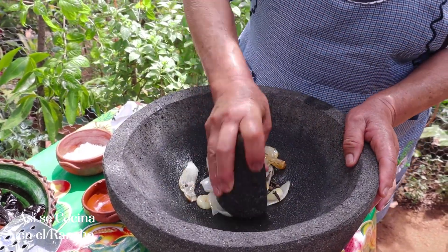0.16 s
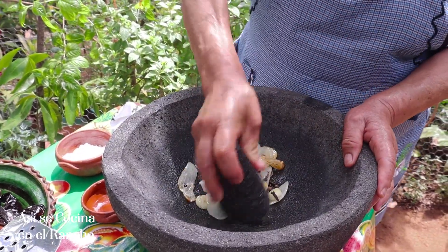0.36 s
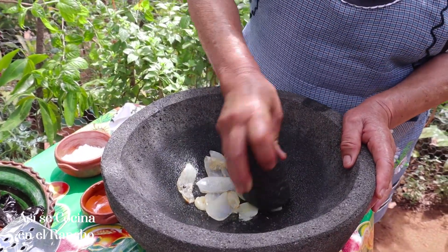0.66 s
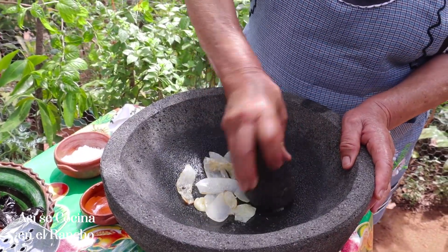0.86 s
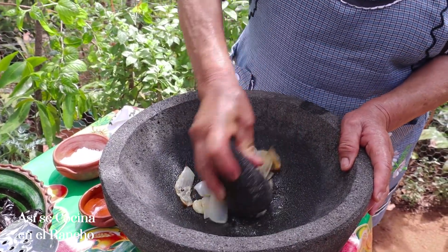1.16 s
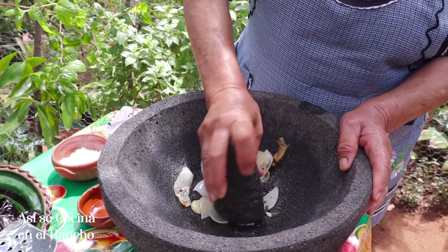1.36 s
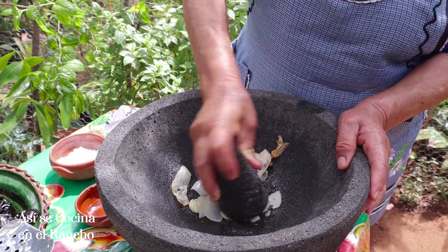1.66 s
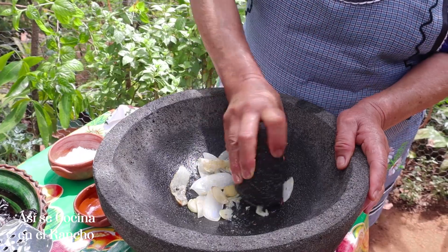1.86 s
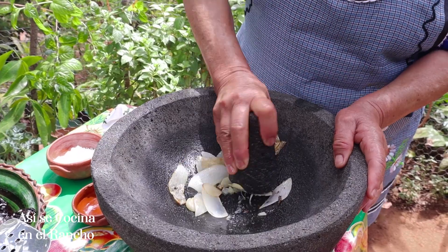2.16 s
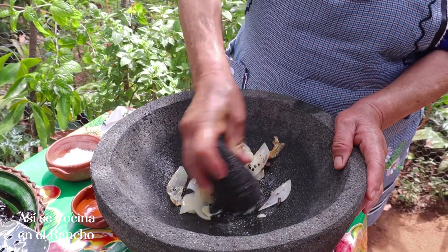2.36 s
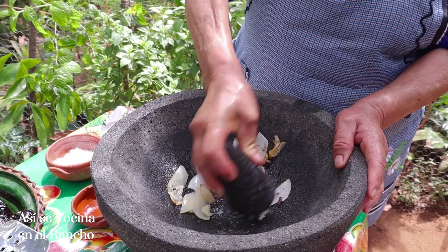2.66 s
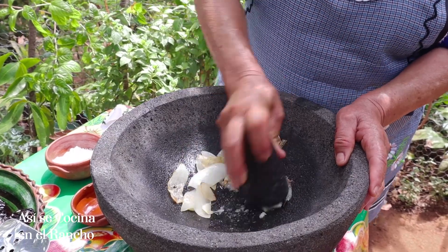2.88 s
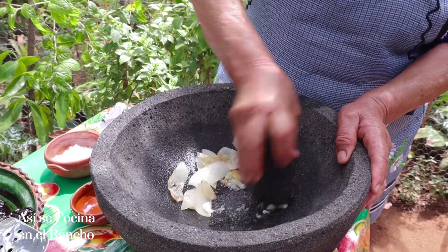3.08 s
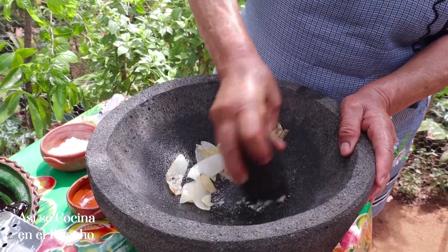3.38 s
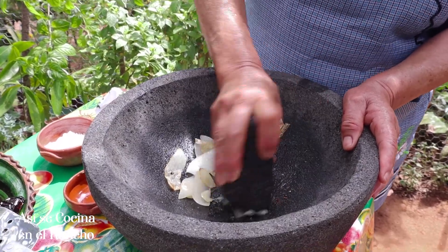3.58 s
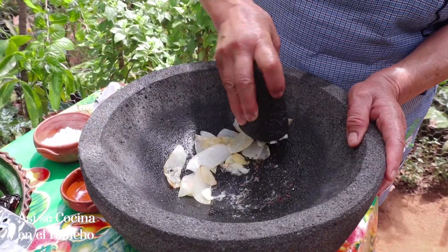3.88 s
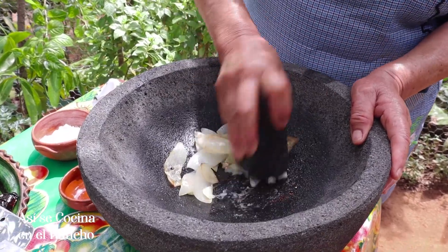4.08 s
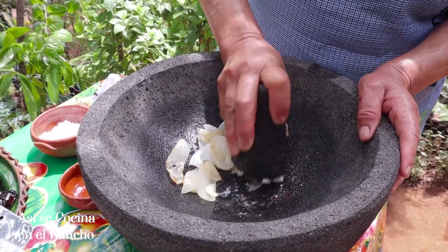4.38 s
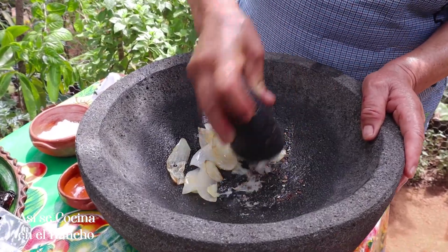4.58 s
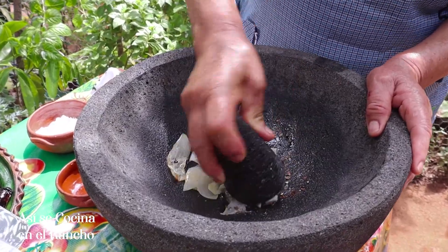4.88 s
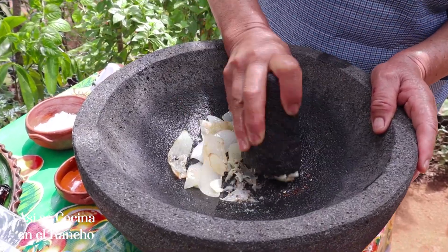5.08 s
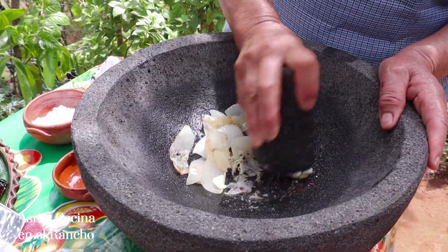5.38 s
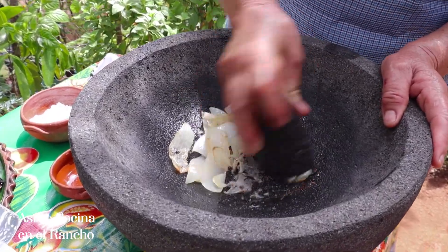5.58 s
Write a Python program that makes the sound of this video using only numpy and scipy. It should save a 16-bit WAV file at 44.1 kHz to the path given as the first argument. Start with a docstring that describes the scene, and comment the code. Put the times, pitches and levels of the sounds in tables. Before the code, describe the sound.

A close, dry outdoor sound of a stone pestle working raw onion and garlic in a heavy porous stone mortar, about six seconds. Two very loud, hard, short knocks come at about 0.07 and 0.37 s, with a tight stony ring. A softer knock lands at 0.84 s amid sparse, faint crackles. From 1.1 s, short irregular pushes, several each second, give crisp snaps, a bright one at 1.3 s, with gritty stone rasp and low bowl rumble. Small knocks cluster around 2.0 to 2.5 s. After 3.2 s the crushing is louder and pulpier, with juicy hiss; a clear knock falls at 3.55 s, a sharp tick at 4.13 s, and a heavier thud with a snap at 4.77 s, followed by the fullest crunch near 4.85 s. Pushes continue, crunchy and wet, to the end. Behind is a very soft outdoor hush with barely audible distant whistles.

```python
"""Hard knocks of a stone pestle on a porous stone mortar open the scene, close by, over a soft outdoor hush.
The pestle then leans on raw onion and garlic in short pushes: crisp flesh snaps, crunches and squirts
while stone rasps on stone and the heavy bowl rumbles. Knocks are short damped tones that excite the bowl's
modes; snaps are decaying bursts of breaks; grinding is random grains coloured by filters and shaped by pressure.
The bowl adds quick echoes, its surroundings a faint scatter."""
import sys
import numpy as np
from scipy import signal
from scipy.fft import rfft, irfft
from scipy.io import wavfile
from scipy.ndimage import uniform_filter1d

SR = 44100
rng = np.random.default_rng(int(sys.argv[2]) if len(sys.argv) > 2 else 0)


def unload_audio(sound):
    """Save the sound as a 16-bit wav file, at the path given as the first command line argument."""
    columns = np.transpose(np.atleast_2d(sound))
    # keep every value between -1 and 1, then stretch to whole-number steps
    steps = np.round(np.clip(columns, -1, 1) * 32767)
    wavfile.write(sys.argv[1], SR, steps.astype(np.int16))


N = 252913
TIME = np.arange(N) / SR
BAND_LIMIT_HZ = 16200

# Spectrum of the outdoor hush: frequency_hz, relative_level_db
GARDEN_SPECTRUM = [(12, -53), (20, 3), (50, 2.5), (91, -9.5), (434, -7.5), (660, -8), (780, -4), (849, -6),
                   (1190, -13.5), (1960, -12.5), (2320, -14), (2600, -15.5), (16000, -32.5)]
GARDEN_DB = -51.5  # about which the hush drifts
# Thin far-off whistles: start_s, length_s, start_hz, end_hz, level_db (before fading and wavering)
FAR_WHISTLES = [(0, 0.057, 2130, 2140, -55), (0.526, 0.12, 2080, 2060, -59), (.63, 0.1, 2500, 2500, -57),
                (2.076, 0.28, 2520, 2380, -60), (2.709, 0.11, 813, 792, -53.5)]
# Decay of the scatter around the bowl: frequency_hz, t60_s
AIR_DECAY = [(200, 0.61), (1200, 0.16), (4000, 0.16), (14000, 0.14)]

# Modes of the mortar: frequency_hz, relative_level_db, t60_s
BOWL_MODES = [(280, -13, .085), (370, -15, .05), (490, -15, .055), (622, -17, .06), (850, -10, .04),
              (1020, -6, .018), (1130, -2.5, .04), (1190, -6, .052), (1525, -7, .032), (1760, -10, .018),
              (2180, -15, .028), (2405, -15, .028), (2610, -16, .02), (3015, -11, .032), (3400, -14, .026),
              (3630, -12, .026), (3790, -17, .014)]
# Landings of the pestle: start_s, thud_peak_db, thud_pitch_hz, thud_decay_cycles (at least 0.1),
# contact_cutoff_hz (higher for a harder contact), ring_peak_db (bowl and grit together)
PESTLE_KNOCKS = [(0.0692, -0.5, 950, 0.62, 1940, -6), (0.1399, -27, 636, 0.33, 3300, -27.5),
                 (0.2028, -27, 293, 1.7, 694, -22.5), (.3670, -1, 1350, 0.079, 3800, -1.5),
                 (0.8387, -13.5, 900, 1.2, 1840, -23), (1.1219, -22.5, 284, 1.54, 900, -25),
                 (1.1920, -36, 296, 1.4, 696, -30.5), (1.322, -28.5, 250, 1.3, 1390, -40),
                 (1.8099, -29.5, 487, 0.78, 3500, -30), (2.0055, -21, 727, 1.25, 1330, -49),
                 (2.0880, -27, 770, 0.59, 1300, -57), (2.2554, -21.5, 261, 0.58, 750, -27.5),
                 (2.3390, -18.5, 218, 0.41, 795, -28), (2.3573, -17, 636, 0.91, 1100, -32),
                 (2.4000, -30, 590, 1.6, 900, -47), (2.4530, -24, 780, 0.57, 1000, -40),
                 (2.459, -29, 284, 1.7, 800, -25), (2.569, -25.5, 188, 0.39, 1300, -28.5),
                 (2.843, -24.5, 142, 0.48, 300, -58), (3.023, -28.5, 960, 1.7, 1300, -30),
                 (3.2620, -23, 890, 0.61, 1370, -25.5), (3.304, -17.5, 553, 1.03, 1310, -21.5),
                 (3.5514, -10.5, 1000, 0.39, 1670, -16.5), (4.0040, -36.5, 96, 0.96, 200, -57),
                 (4.1355, -37, 450, 0.46, 3500, -25), (4.2610, -25, 645, 0.92, 1400, -32.5),
                 (4.7662, -9, 570, 0.89, 1330, -19.5), (4.7678, -10, 188, 0.44, 400, -20.5),
                 (5.4255, -25, 590, 0.29, 1180, -34)]
# Crisp pieces giving way: start_s, level_db (over 5 ms), pitch_hz (at most SR / 4), tear_decay_s
FLESH_SNAPS = [(0.14, -47.5, 2700, 0.0016), (0.1982, -31.5, 2750, 0.013), (0.2065, -32, 7550, 0.0006),
               (0.3675, -29, 2620, 0.00064), (0.7428, -35, 7050, 0.00035), (0.772, -36.5, 5700, 0.0013),
               (0.9742, -27.5, 5570, 0.0035), (1.0507, -27.5, 4100, 0.0009), (1.0579, -29.5, 6200, 0.00033),
               (1.121, -21, 4530, 0.0015), (1.1297, -25.5, 9000, 0.00024), (1.1396, -29.5, 6700, 0.0016),
               (1.3, -32.5, 6700, 0.00038), (1.321, -16.5, 3830, 0.00071), (1.3246, -16.5, 4000, 0.0018),
               (1.33, -31, 3900, 0.002), (1.339, -32, 4800, 0.0018), (1.3677, -32.5, 6500, 0.0019),
               (1.5884, -37.5, 5700, 0.00063), (1.6411, -34, 7160, 0.00038), (1.8097, -35, 3740, 0.0022),
               (1.9883, -29.5, 3630, 0.0028), (2.2088, -34, 4970, 0.0011), (2.2308, -39, 4900, 0.00074),
               (2.2556, -22, 3430, 0.0017), (2.3368, -20.5, 5560, 0.0025), (2.5296, -38, 4230, 0.0018),
               (2.5666, -26, 5100, 0.00078), (2.5687, -18.5, 5150, 0.0013), (2.7113, -30, 4800, 0.00049),
               (2.84, -34.5, 4240, 0.0061), (2.9475, -26.5, 7040, 0.0098), (3.0088, -23.5, 3530, 0.0029),
               (3.2128, -27.5, 6300, 0.00031), (3.3271, -22, 9200, 0.0051), (3.365, -31, 12100, 0.00017),
               (3.51, -27, 4840, 0.0016), (3.5472, -32.5, 4760, 0.0038), (4.1168, -32, 4800, 0.0014),
               (4.1345, -10, 4640, 0.00017), (4.138, -25, 5370, 0.0023), (4.1924, -25, 4440, 0.00039),
               (4.221, -32.5, 7000, 0.00022), (4.4787, -32.5, 7600, 0.00067), (4.7635, -17.5, 3760, 0.0019),
               (4.767, -16.5, 3630, 0.00055), (5.1813, -27, 4800, 0.0019), (5.696, -25, 5070, 0.0074)]

# Pushes of the pestle: start_s, length_s, swell_db (over the push), crunch_db, fizz_db, rasp_db,
# rumble_db, wedge_hz (starting resonance of the air wedge under the pestle)
PESTLE_PUSHES = [(0.001, 0.051, 16.5, -53.0, -50.5, -67.0, -55, 4400.0),
                 (0.044, 0.024, 3, -52.0, -57, -34, -38.5, 3030.0),
                 (0.172, 0.049, -1, -49.0, -56.0, -42.5, -51, 3910.0),
                 (0.257, 0.031, -5, -48, -48, -54.0, -67.0, 4800),
                 (0.299, 0.06, 8, -47.5, -51.5, -67, -59.0, 3000.0),
                 (0.349, 0.062, -13, -65.0, -79, -52, -45.0, 2950.0),
                 (0.562, 0.04, -3, -49, -51, -64, -69.0, 4700),
                 (0.69, 0.15, -12, -47, -48.5, -58, -50, 5250),
                 (0.885, 0.061, 14, -54, -50.5, -58, -52, 5180.0),
                 (0.967, 0.019, 3.5, -48, -52, -49, -41, 5480.0),
                 (1.039, 0.062, -21, -42, -47, -44, -39.5, 4060.0),
                 (1.106, 0.025, 4.0, -33.5, -34.5, -43, -35, 4960.0),
                 (1.205, 0.029, 3, -62, -51, -64, -45, 4570.0),
                 (1.217, 0.076, -3, -44.5, -45.5, -55, -48, 5280.0),
                 (1.304, 0.069, -2, -38.5, -39.5, -44.5, -40.5, 3540),
                 (1.385, 0.057, -10.5, -41.0, -44, -49, -45, 4670.0),
                 (1.478, 0.099, 10, -44, -46.5, -56.5, -48.5, 5110.0),
                 (1.62, 0.05, -3.5, -40, -43.5, -40, -36.5, 5000),
                 (1.699, 0.058, -9.5, -40.5, -47.5, -43.5, -48, 2720),
                 (1.8, 0.024, 0, -56, -56, -39, -43, 3450.0),
                 (1.853, 0.13, -7, -43.5, -45, -48.5, -42.5, 4760.0),
                 (1.975, 0.028, 9, -46.0, -41.5, -38.5, -34.0, 3160.0),
                 (2.028, 0.064, 4, -49, -50.0, -52.0, -47.5, 3220),
                 (2.147, 0.062, 12.5, -44.5, -47, -48.0, -42.0, 4840.0),
                 (2.252, 0.0093, 0, -42.5, -58, -38, -32, 3380.0),
                 (2.316, 0.061, 7, -41.0, -42, -43, -37.5, 4710.0),
                 (2.482, 0.049, -10, -39.5, -45.0, -40.5, -34.0, 3840.0),
                 (2.554, 0.12, -9, -40.5, -44, -39.0, -36.5, 4620.0),
                 (2.697, 0.031, -3.0, -56, -51, -58.0, -44, 5010.0),
                 (2.824, 0.083, -8, -51.5, -50.5, -53, -45.5, 4170.0),
                 (2.921, 0.049, 10, -45.0, -41.5, -57, -44.5, 5590.0),
                 (2.949, 0.085, 1.5, -44.5, -52.0, -42.5, -40.5, 3710.0),
                 (3.127, 0.043, -1, -41, -54.0, -38.5, -40.5, 4600),
                 (3.154, 0.084, -22, -42.5, -37.0, -47, -46, 5740.0),
                 (3.21, 0.093, 7, -51, -56, -42.5, -48, 4820.0),
                 (3.274, 0.061, 5.5, -36.5, -35.0, -35.5, -35, 5760.0),
                 (3.352, 0.066, -4.0, -49.5, -53, -60, -54, 5330.0),
                 (3.431, 0.062, 8, -33.5, -36.5, -44.5, -43, 5010.0),
                 (3.595, 0.07, -2.5, -31.5, -33.5, -30, -39, 4700),
                 (3.671, 0.031, -2.5, -40.5, -42.0, -44.5, -36, 4860),
                 (3.754, 0.01, -7, -49, -44, -69, -67.0, 4720.0),
                 (3.984, 0.065, -13.5, -32.5, -41.0, -49.5, -56, 3300),
                 (4.058, 0.065, 16.5, -32, -39, -48, -44, 4400),
                 (4.121, 0.12, -13.5, -32, -34, -38, -34, 4920.0),
                 (4.306, 0.059, 11.0, -40, -45.5, -49, -45.5, 4740),
                 (4.405, 0.079, -1, -36.5, -43, -44.5, -47.5, 4250),
                 (4.465, 0.056, -10, -32, -36.5, -37, -38, 4940),
                 (4.524, 0.03, 12, -45.5, -42.5, -68, -62.0, 4990.0),
                 (4.739, 0.095, -7.5, -34.5, -37.5, -46, -37.5, 3340.0),
                 (4.833, 0.1, -9.5, -24, -38.5, -43, -39.0, 4160),
                 (5.029, 0.07, 2, -31.5, -37.5, -46.5, -41.5, 3300),
                 (5.098, 0.079, 3.0, -41.5, -46.5, -49.0, -44.5, 4540),
                 (5.155, 0.12, -4.5, -33.0, -36.5, -42.0, -40, 4540),
                 (5.343, 0.1, -16.5, -37, -37, -42, -40, 4500),
                 (5.414, 0.021, 2, -44, -49, -39, -33.5, 3130),
                 (5.478, 0.029, -3, -35.5, -36, -41.5, -44, 4160.0),
                 (5.51, 0.042, 4.5, -38, -34.5, -41.5, -36.5, 4600),
                 (5.579, 0.01, 1, -62, -60, -55, -45, 5020.0),
                 (5.647, 0.038, 11, -36.5, -37.5, -46.5, -42.5, 4570.0),
                 (5.714, 0.045, 1, -40, -45, -39, -32, 4600)]
# Whole pieces crackle, pulp hisses evenly: time_s, click_share (of the power, 0-1)
CRISPNESS_CURVE = [(0, 0.87), (1.2, 0.55), (2.9, 0.87), (3.4, 0), (4.2, 0.48), (4.85, 0.24), (5.5, 0.65)]
# Spectrum of the crunching flesh: frequency_hz, relative_level_db
CRUNCH_SPECTRUM = [(600, -28.5), (1500, -11.5), (2000, -6.5), (2800, -2), (3500, 1.5), (4300, -4),
                   (5100, -2.5), (6000, -3.5), (7200, -17.5), (10000, -29), (16000, -44)]
# Spectrum of the juicy fizz: frequency_hz, relative_level_db
FIZZ_SPECTRUM = [(2500, -39.5), (5000, 7.5), (7000, 9), (9000, 8), (11500, 7), (14000, 3.5), (15300, -1),
                 (16500, -17)]
# Spectrum of stone rasping on stone: frequency_hz, relative_level_db
RASP_SPECTRUM = [(200, -9), (400, 1), (580, 4.5), (830, 1), (1080, -0.5), (1200, 0.5), (1380, -6.5),
                 (2000, -6), (3000, -30), (6000, -50)]
# Spectrum of the rumbling bowl: frequency_hz, relative_level_db
RUMBLE_SPECTRUM = [(20, -27), (50, -12), (85, -1.5), (115, -9), (165, 2), (205, -2), (280, 2.5),
                   (350, -7.5), (450, -19), (700, -33), (2000, -42.5)]
# Gain of the top treble in the fizz: time_s, gain_db
FIZZ_TREBLE = [(0, 0.5), (1.2, -0.5), (2.2, 3), (3.3, -1), (3.7, 2), (4.15, 5.5), (4.8, 3.5), (5.2, -4.5),
               (5.6, -6)]
FIZZ_TREBLE_HZ = 10400

# Pressure builds over a share of the push, drops as the hand lets go, then the pulp settles quietly
ATTACK_SHARE = 0.33
RELEASE_DB_PER_S, SETTLE_DB, SETTLE_DB_PER_S = 750, -16.5, 120
# The flesh gives first; the stone is reached, and the bowl rocks, a little later
STONE_LAG_S, BOWL_LAG_S = 0.0011, 0.01
WEDGE_OCTAVES_PER_S = 0.55  # the air wedge narrows as the pestle rolls
RASP_RING_DB = -12  # rasp ringing in the bowl's modes, relative to the direct rasp
PEEL_DB, PEEL_CLING_S = -13.5, 0.091  # level relative to the fizz; time the wet pulp clings


def amp(db):
    """Level law: decibels to amplitude ratio."""
    return 10 ** (np.asarray(db) / 20)


def unit(x):
    """Normalization: scales a signal to rms 1."""
    return x / np.sqrt(np.mean(x ** 2) + 1e-20)


def read(points, hz):
    """Interpolation: reads a table on a log-frequency axis."""
    f, value = np.transpose(points)
    return np.interp(np.log(hz + 1), np.log(f + 1), value)


def add(mix, s, sound):
    """Superposition: mixes a sound in at time s."""
    part = mix[max(round(s * SR), 0):][:len(sound)]
    part += sound[:len(part)]


def butter(x, hz, kind, order=2):
    """Butterworth filtering: a causal low-pass or high-pass, cut-off at most SR / 3."""
    return signal.sosfilt(signal.butter(order, min(hz, SR / 3), kind, fs=SR, output="sos"), x)


def colour(x, points, size=2048):
    """Minimum-phase filtering: a causal response with a given spectrum keeps the front of a click sharp."""
    log_gain = np.log(amp(read(points, abs(np.fft.fftfreq(size, 1 / SR)))))
    response = np.fft.ifft(np.exp(np.conj(signal.hilbert(log_gain)))).real
    return signal.oaconvolve(x, response)[:len(x)]


def wander(hz):
    """Band-limited noise: a random drift of rms 1, strongest a little below hz."""
    ratio = np.fft.rfftfreq(N, 1 / SR) / hz
    return unit(irfft(rfft(rng.standard_normal(N)) * ratio / (1 + ratio ** 4), N))


def grains(per_s, spread_db):
    """Random impulses: tiny breaks; a wider spread makes many small and a few large."""
    size = amp(spread_db * np.minimum(rng.exponential(1, N), 3.3))
    sign = rng.choice([-1., 1.], N)
    occurs = rng.random(N) < per_s / SR
    return unit(size * sign * occurs)


def patchy(x, depth_db, size=(16, 9)):
    """Time-varying spectrum: the colour shifts as the contact moves over pieces and pores."""
    z = signal.stft(x, SR, nperseg=256)[2]
    field = rng.standard_normal(z.shape)
    # smooth over time frames, then over frequency bins
    field = uniform_filter1d(field, size[0], axis=1)
    field = uniform_filter1d(field, size[1], axis=0)
    return unit(signal.istft(z * amp(depth_db * unit(field)), SR, nperseg=256)[1][:N])


def resonate(x, hz, width_hz):
    """Resonance: a peak of gain 1 follows the curve hz, by shifting it to zero frequency and back."""
    turn = np.exp(2j * np.pi * np.cumsum(hz) / SR)
    r = np.exp(-np.pi * width_hz / SR)
    return 2 * (turn * signal.lfilter([1 - r], [1, -r], x / turn)).real


def garden(drift_db=1.3, waver=0.0071, fade_db=4):
    """Ambient noise: a soft drifting hush, and far-off whistles as wavering, fading sines."""
    hush = unit(colour(rng.standard_normal(N), GARDEN_SPECTRUM))
    out = amp(GARDEN_DB + drift_db * wander(13.5)) * hush
    sway = 1 + waver * wander(56)
    fade = unit(amp(fade_db * np.clip(wander(27), -2, 1.5)))
    for s, length, start_hz, end_hz, db in FAR_WHISTLES:
        hz = np.linspace(start_hz, end_hz, round(length * SR))
        start = max(round(s * SR), 0)
        turns = np.cumsum(hz * sway[start:][:len(hz)]) / SR
        swell = fade[start:][:len(hz)] * signal.windows.tukey(len(hz), .5)
        add(out, s, amp(db) * swell * np.sin(2 * np.pi * turns))
    return out


def surroundings(x, wall_db=-12, wall_t60_s=0.026, air_db=-25, move_hz=0.708, count=4):
    """Reflection: bowl-wall echoes shift as the hand moves; table and plants scatter faintly."""
    t = np.arange(SR // 3) / SR
    sign = rng.choice([-1., 1.], (count + 1, len(t)))
    taps = sign * (rng.random((count + 1, len(t))) < 4000 / SR)
    # the scatter decays at its own rate in each band
    hz, age, z = signal.stft(taps[-1] * (t > .006), SR, nperseg=256)
    decay = amp(-60 * age / read(AIR_DECAY, hz)[:, None])
    air = signal.istft(z * decay, SR, nperseg=256)[1][:len(t)]
    out = x + amp(air_db) * signal.oaconvolve(x, air / np.linalg.norm(air))[:N]
    for k in range(count):
        walls = taps[k] * amp(-60 * t / wall_t60_s) * (t > .0007)
        # the bowl is too small to throw back long waves
        echo = butter(walls / np.linalg.norm(walls), 1970, "high")
        # each place of the hand has its own echoes
        place = np.maximum(np.cos(2 * np.pi * (move_hz * TIME - k / count)), 0)
        out = out + amp(wall_db) * signal.oaconvolve(x * place, echo)[:N]
    return out


def bowl_ring(scatter_db):
    """Modal vibration: a sum of damped sines; each spot of the bowl weights them differently."""
    t = np.arange(SR // 5) / SR
    hz, db, t60 = np.transpose(BOWL_MODES)[:, :, None]
    spot_db = scatter_db * rng.standard_normal(hz.shape)
    # neighbouring modes move the rim in opposite directions, so the ring takes a few ms to build
    sign = (-1) ** np.arange(len(hz))[:, None]
    return (sign * amp(db + spot_db - 60 * t / t60) * np.sin(2 * np.pi * hz * t)).sum(0)


def knocks(scatter_db=4.0, swell=0.66, leak=0.58, ring_low_hz=230, grit_db=-7, grit_s=0.0052):
    """Impact: the stopped pestle pushes out a short thud; harder contacts reach higher bowl modes."""
    out, t = np.zeros(N), np.arange(SR // 5) / SR
    for s, thud_db, thud_hz, cycles, contact_hz, ring_db in PESTLE_KNOCKS:
        age = t * thud_hz / max(cycles, .1)
        thud = age ** swell * np.exp(-age) * np.sin(2 * np.pi * thud_hz * t)
        # slow pressure changes leak around the stone instead of radiating
        thud = butter(thud, leak * thud_hz, "high", order=1)
        # the rough faces chatter for a few ms as they seat
        grit = butter(rng.standard_normal(len(t)) * np.exp(-t / grit_s), 2600, "low", order=4)
        modes = bowl_ring(scatter_db)
        ring = modes / abs(modes).max() + amp(grit_db) * grit / abs(grit).max()
        ring = butter(ring, contact_hz, "low", order=3)
        ring = butter(ring, ring_low_hz, "high", order=3)
        knock = amp(thud_db) * thud / abs(thud).max() + amp(ring_db) * ring / abs(ring).max()
        add(out, s, knock)
    return out


def snaps(relative_width=0.39, splinter_db=4.5, first_crack=1.44, edge_db=-13, low_hz=2100):
    """Brittle fracture: one sharp break and a dying burst of smaller ones excite a broad resonance."""
    out, t = np.zeros(N), np.arange(SR // 30) / SR
    for s, db, hz, length in FLESH_SNAPS:
        splinters = amp(splinter_db * rng.standard_normal(len(t)))
        breaks = unit(rng.standard_normal(len(t)) * splinters)
        breaks[0] = first_crack
        tear = breaks * np.exp(-t / max(length, 1 / SR))
        # the broken piece rings for a cycle or two
        body = signal.lfilter(*signal.iirpeak(min(hz, SR / 4), 1 / relative_width, fs=SR), tear)
        snap = butter(body + amp(edge_db) * tear, low_hz, "high", order=3)
        snap = butter(snap, SR / 3, "low")
        rms_5ms = np.sqrt(np.sum(snap ** 2) / (SR // 200))
        add(out, s, amp(db) * snap / rms_5ms)
    return out


def pressure(levels_db, lag_s=0):
    """Contact force: build, a hold that swells or eases, quick release and faint settling; powers add."""
    power, t = np.zeros(N), np.arange(SR // 2) / SR
    for (s, length, swell_db, *_), db in zip(PESTLE_PUSHES, levels_db):
        progress = np.minimum(t / max(length, 1 / SR), 1)
        after = np.maximum(t - length, 0)
        build = np.minimum(progress / ATTACK_SHARE, 1)
        hold = amp(db + swell_db * (progress - .5))
        release = np.maximum(amp(-RELEASE_DB_PER_S * after), amp(SETTLE_DB - SETTLE_DB_PER_S * after))
        add(power, s + lag_s, (build * hold * release) ** 2)
    return np.sqrt(power)


def wedge_pitch(starts, hz):
    """Cavity resonance: the air under the pestle starts anew at each push and glides up as it rolls."""
    push = np.maximum(np.searchsorted(starts, TIME) - 1, 0)
    return hz[push] * 2 ** (WEDGE_OCTAVES_PER_S * (TIME - starts[push]))


def peeling(fizz):
    """Adhesion: wet pulp pulling off the stone ticks sparsely during and around each push."""
    wet = np.sqrt(abs(uniform_filter1d(fizz ** 2, round(PEEL_CLING_S * SR))))
    ticks = colour(grains(per_s=90, spread_db=8.5), FIZZ_SPECTRUM)
    return amp(PEEL_DB) * wet * patchy(ticks, depth_db=5)


def sparkle(x):
    """Spectral tilt: raises or lowers the top treble over time."""
    f = np.fft.rfftfreq(N, 1 / SR)
    top = irfft(rfft(x) * (1 - 1 / (1 + (f / FIZZ_TREBLE_HZ) ** 10)), N)
    gain = amp(np.interp(TIME, *np.transpose(FIZZ_TREBLE)))
    return x + (gain - 1) * top


def grinding(judder_hz=80, judder_db=3.5, patch_db=3.0, wedge_width_hz=1700):
    """Stick-slip friction: cells burst, juice fizzes, and the pores of the stone catch."""
    starts, _, _, crunch_db, fizz_db, rasp_db, rumble_db, wedge_hz = np.transpose(PESTLE_PUSHES)
    crunch, fizz = pressure(crunch_db), pressure(fizz_db)
    rasp, rumble = pressure(rasp_db, STONE_LAG_S), pressure(rumble_db, BOWL_LAG_S)
    crisp = np.clip(np.interp(TIME, *np.transpose(CRISPNESS_CURVE)), .01, 1)
    judder = unit(amp(judder_db * np.sqrt(crisp) * np.clip(wander(judder_hz), -2, 2)))

    # larger cell walls click across the whole treble, over a dense mush of small ones
    crackle = np.sqrt(crisp) * grains(per_s=1100, spread_db=7.5)
    mush = np.sqrt(1 - crisp) * grains(per_s=3600, spread_db=0.0)
    flesh = colour(judder * (crackle + mush), CRUNCH_SPECTRUM)
    flesh = flesh + resonate(flesh, wedge_pitch(starts, wedge_hz), wedge_width_hz)

    squirts = np.sqrt(1 - crisp) * grains(per_s=11000, spread_db=12.5)
    juice = colour(judder * (crackle + squirts), FIZZ_SPECTRUM)

    # the catching pores are heard directly and through the bowl's modes
    pores = judder * grains(per_s=1100, spread_db=3.0)
    ringing = unit(signal.oaconvolve(pores, bowl_ring(0))[:N])
    stone = unit(colour(pores, RASP_SPECTRUM)) + amp(RASP_RING_DB) * ringing
    stone = unit(butter(stone, 110, "high"))

    # the pestle rides over lumps and rocks the heavy bowl
    bumps = judder * grains(per_s=400, spread_db=1.5)
    rocking = unit(colour(bumps, RUMBLE_SPECTRUM))

    crunching = crunch * patchy(flesh, patch_db)
    fizzing = sparkle(fizz * patchy(juice, patch_db) + peeling(fizz))
    return crunching + fizzing + rasp * stone + rumble * rocking


def scene():
    """Superposition: the mortar with its reflections, and the garden."""
    mortar = surroundings(knocks() + snaps() + grinding())
    return (mortar + garden())[None]


def record(dry, ceiling=1.6):
    """Saturation and band limiting: rounds off the loudest peaks, then removes the extreme treble."""
    rounded = dry / (1 + (dry / ceiling) ** 4) ** (1 / 4)
    low_pass = signal.firwin(401, BAND_LIMIT_HZ, window=("kaiser", 9), fs=SR)
    return signal.oaconvolve(rounded, low_pass[None], "same")


dry = scene()
out = record(dry)
unload_audio(out)
```